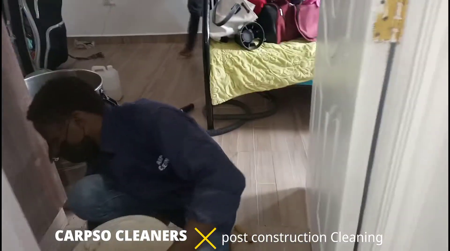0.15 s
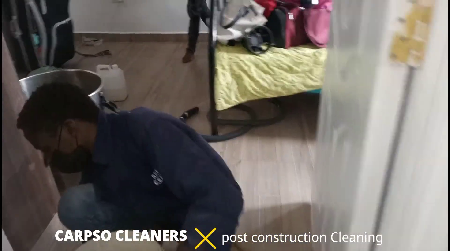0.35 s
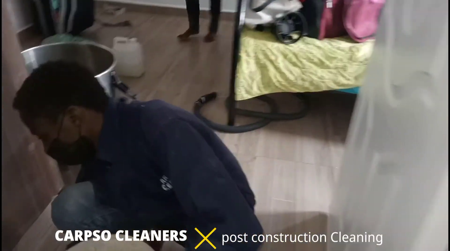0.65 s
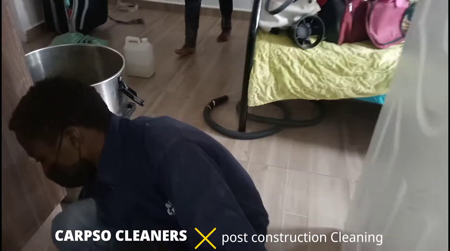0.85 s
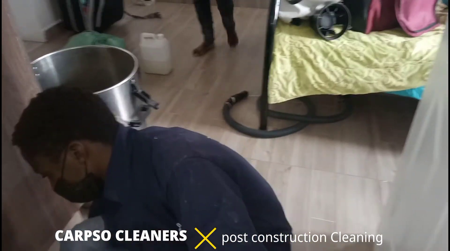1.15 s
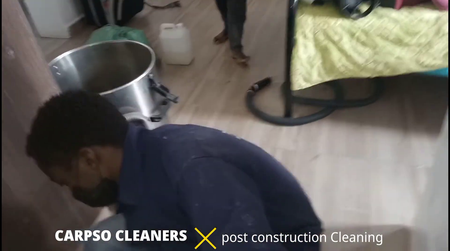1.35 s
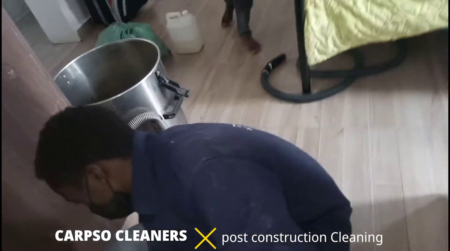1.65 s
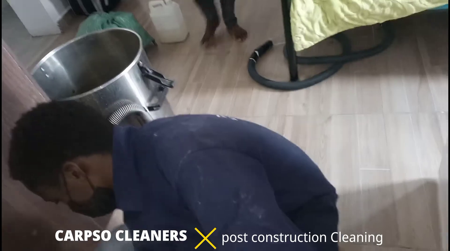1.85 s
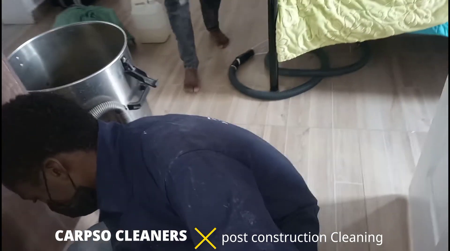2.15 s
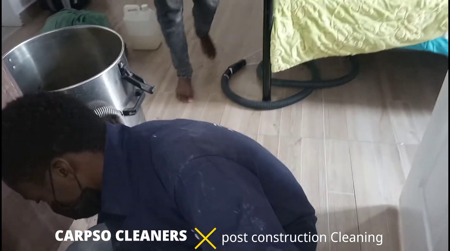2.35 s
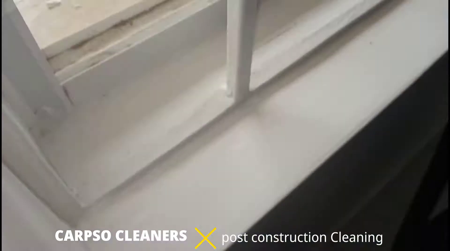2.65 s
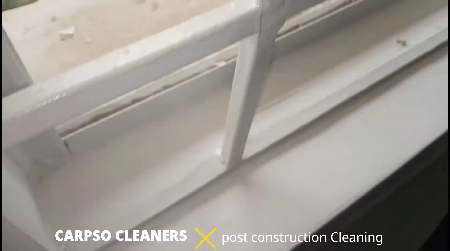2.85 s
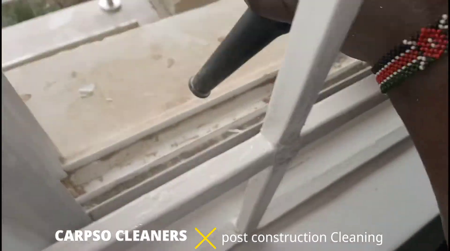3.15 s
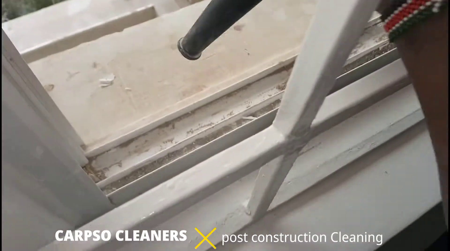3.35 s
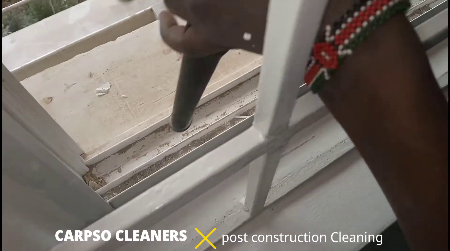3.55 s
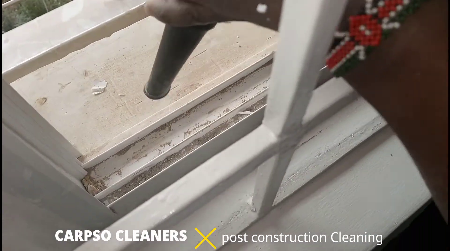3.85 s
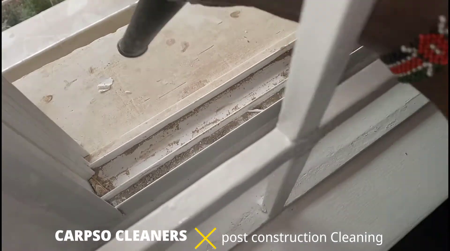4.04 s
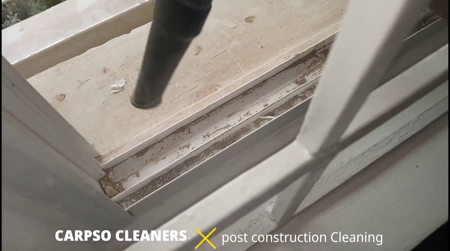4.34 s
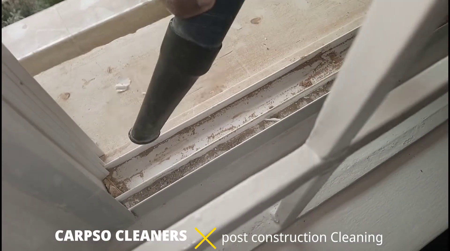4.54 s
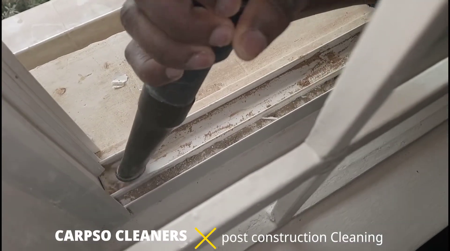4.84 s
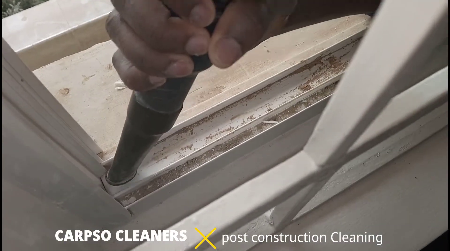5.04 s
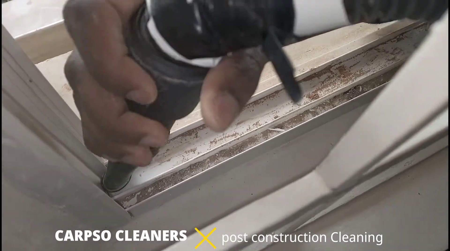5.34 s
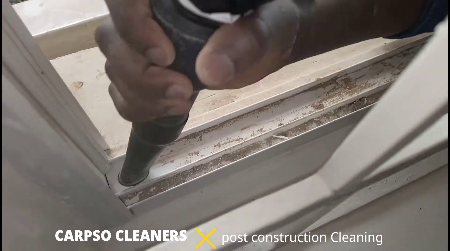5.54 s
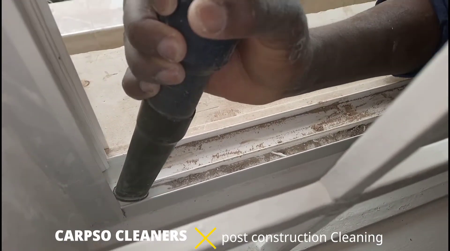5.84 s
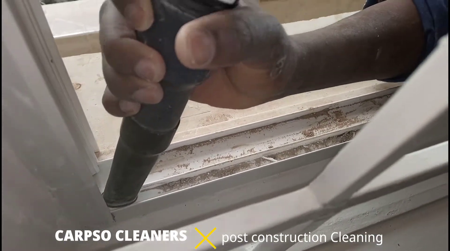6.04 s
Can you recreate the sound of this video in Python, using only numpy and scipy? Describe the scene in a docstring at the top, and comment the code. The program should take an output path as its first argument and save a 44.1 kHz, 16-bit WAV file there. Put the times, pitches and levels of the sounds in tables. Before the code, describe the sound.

Indoors, a very faint, muffled vacuum cleaner rush flutters and builds, with a few soft handling bumps, then stops short. The cleaner returns loud and close, with roaring air, a hissing nozzle and a throbbing motor hum and whine. The nozzle taps a window sill and presses into the corner, choking the roar into a raspy shriek while grit ticks up the tube. It then eases open again. The sound is mono.

```python
"""A faint, muffled vacuum rush with fluttering treble builds up and stops short; then the two-motor
cleaner is heard close up, in mono. Air roars in the hose and hisses at the crevice nozzle. The motors
run a few turns a second apart, so their hum throbs and their whine is doubled. Pressed into the corner
of a window sill, the nozzle chokes the roar, shrieks through the remaining gap and draws in grit."""
import sys
import numpy as np
from scipy import signal
from scipy.fft import rfft, irfft, next_fast_len
from scipy.io import wavfile
from scipy.ndimage import uniform_filter1d, map_coordinates

SR = 44100
rng = np.random.default_rng(int(sys.argv[2]) if len(sys.argv) > 2 else 0)


def to_wav(s):
    """Save 16-bit WAV."""
    ch = np.atleast_2d(s).T  # columns
    pcm = np.round(np.clip(ch, -1, 1) * 32767)  # PCM
    wavfile.write(sys.argv[1], SR, pcm.astype(np.int16))


N = 272979
TIME_S = np.arange(N) / SR


# Airflow spectra: freq_hz, relative_db
HOSE_ROAR = [(25, -35), (50, -24), (85, -19), (100, -4), (112, -10), (135, -2.5), (160, -10.5), (187, 3.5),
             (215, -5.5), (255, 2), (330, 1), (390, -3.5), (438, 1.5), (490, -6.5), (580, 0.5), (720, -26),
             (1100, -44)]
DUCT_RUSH = [(100, -50), (400, -5.5), (760, -3), (1000, -2.5), (1250, -1), (1500, -2), (1850, 0.5),
             (2200, 1.5), (2600, -4), (3200, -5.5), (5000, -40)]
LIP_HISS = [(300, -64), (1800, -18), (2700, -7), (3350, 0), (3700, -2.5), (4200, 0.5), (5100, 2), (5600, 0),
            (6500, 2.5), (7200, -3), (8000, -9.5), (9300, -7.5), (11000, -14), (13000, -19.5)]
LIP_FIZZ = [(1000, -60), (7000, -29), (10500, 4), (12000, -8), (13600, -7), (14600, 7), (15400, 8),
            (16000, -20)]
# Hiss envelope: time_s, level_db
HISS_ENVELOPE = [(2.8, -22.5), (3.1, -22.5), (3.4, -22.5), (3.85, -24), (4.3, -22), (5.3, -21.5),
                 (5.7, -22), (6.1, -20.5)]
# Gulps of air in the duct: peak_s, length_s, gain_db
DUCT_GULPS = [(5.456, 0.18, 3.5), (5.74, 0.12, 3.5)]

def airflow(seal):
    """Turbulent air in hose, duct and nozzle; sealing chokes the roar and makes the lip sputter."""
    gulp_db = sum(db * swell(peak_s, length_s) for peak_s, length_s, db in DUCT_GULPS)
    roar = amp(-32.5 - 14 * seal) * turbulence(spectrum(HOSE_ROAR), patchy_db=0.5)
    duct = amp(-29 - 1.1 * seal + gulp_db) * turbulence(spectrum(DUCT_RUSH), patchy_db=1.57)
    hiss = amp(curve(HISS_ENVELOPE)) * turbulence(spectrum(LIP_HISS), patchy_db=2.13)
    fizz = amp(-43 + 9.7 * np.sqrt(seal)) * noise(spectrum(LIP_FIZZ))
    sputter = amp(0.4 * wobble(12) + 0.9 * seal * wobble(250))
    return roar + duct + (hiss + fizz) * sputter


# Slower shaft: time_s, speed_hz
SHAFT_SPEED = [(2.7, 283.3), (3.1, 285), (3.35, 286.4), (3.57, 286.9), (3.75, 285), (3.9, 284.1),
               (4.3, 284.5), (5, 286), (5.7, 287.7), (6.19, 287)]
# Faster shaft's lead, the throb rate: time_s, lead_hz
SHAFT_LEAD = [(2.7, 1.7), (3.2, 4.1), (3.6, 5.32), (4.05, 5.98)]
# Shaft harmonics: multiple, slow_motor_db, fast_motor_db
HARMONICS = [(1, -31, -30), (2, -50, -52.5), (4, -44, -50), (6, -31.5, -36.5), (12, -63, -43)]
# Whine envelope: time_s, gain_db
WHINE_ENVELOPE = [(2.85, -3), (3.15, 0), (3.5, -4), (3.75, -1), (4.45, 1), (4.92, 0), (5.1, -3),
                  (5.45, 2.5), (6.0, 1.5)]

def motors(seal, choke_db=-11.5, opposed_s=5.068, lowest_whine_multiple=4):
    """Two rotors beat, the faster gaining one turn per throb. Less sound escapes a closed nozzle."""
    slow_turns = np.cumsum(curve(SHAFT_SPEED)) / SR
    lead_turns = np.cumsum(curve(SHAFT_LEAD)) / SR
    fast_turns = slow_turns + lead_turns - lead_turns[round(opposed_s * SR)] + 0.5
    multiples, slow_db, fast_db = np.transpose(HARMONICS)
    whine = amp(curve(WHINE_ENVELOPE))
    tones = 0
    for turns, levels_db in ((slow_turns, slow_db), (fast_turns, fast_db)):
        angle = 2 * np.pi * turns + 0.03 * wobble(40)
        for multiple, db in zip(multiples, levels_db):
            gain = amp(db) * (whine if multiple >= lowest_whine_multiple else 1)
            tones += np.sqrt(2) * gain * np.sin(round(multiple) * angle)
    return amp(choke_db * seal ** 1.26 + 0.32 * wobble(25)) * tones


# Resonances of the nearly closed nozzle: centre_hz, width_hz, gain_db
RASP_MODES = [(3220, 120, -1.5), (3690, 360, -2.5), (4050, 210, 2.5), (4370, 170, -1.5)]
SHRIEK_MODES = [(5890, 420, -1), (6400, 360, 3.5), (7090, 450, 2), (8560, 1040, -7.5), (9900, 1000, -11.5)]
# Jet balance, positive towards the rasp: time_s, tilt_db
JET_BALANCE = [(4.95, -0.5), (5.14, -4), (5.23, 3), (5.4, -1.5), (5.58, 0), (5.8, -6), (6.1, -3.5)]

def gap_jet(seal, flutter_db=1.46):
    """The jet through the last gap grows with the seal, sputters and rings the nozzle's resonances."""
    tilt_db = curve(JET_BALANCE)
    rasp = amp(-18 + tilt_db) * seal ** 1.36 * turbulence(resonances(RASP_MODES), patchy_db=3.0)
    shriek = amp(-18 - tilt_db) * seal ** 1.17 * turbulence(resonances(SHRIEK_MODES), patchy_db=2.5)
    low_cut = spectrum([(1200, -20), (3000, -0.5)])
    return amp(flutter_db * wobble(220)) * filtered(rasp + shriek, low_cut)


# Nozzle passes: peak_s, length_s, level_db, pitch_hz, glide_hz_per_s, width_hz
NOZZLE_PASSES = [(3.42, 0.4, -34, 6490, 48.5, 807), (4.151, 0.52, -29.5, 4240, 602, 798),
                 (4.701, 0.43, -26.5, 5460, 2300, 955), (5.25, 0.065, -18, 4070, -1500, 600),
                 (5.365, 0.14, -23.5, 3230, 0.5, 199.4), (5.85, 0.37, -29, 4100, -600, 908),
                 (6.182, .08, -24, 3750, -200, 502)]

def nozzle_rings():
    """The air between nozzle and sill rings, gliding as the nozzle moves."""
    rings = 0
    for peak_s, length_s, db, pitch_hz, glide_hz_per_s, width_hz in NOZZLE_PASSES:
        gliding_hz = pitch_hz + glide_hz_per_s * (TIME_S - peak_s)
        rings += amp(db) * swell(peak_s, length_s) * fuzzy_tone(gliding_hz, width_hz)
    return rings


def grit(seal, sealed_grains_per_s=110, gain_db=-18.5):
    """Grains tick up the tube, more of them as the nozzle nears the sill."""
    hits = rng.random(N) < sealed_grains_per_s * seal / SR
    sizes = amp(3.9 * np.minimum(rng.exponential(size=N), 3))
    signs = rng.choice([-1, 1], N)
    tube = resonances([(4200, 1800, -16), (6900, 1600, 15.5), (12000, 5000, 0)])
    return amp(gain_db) * filtered(hits * sizes * signs, tube)


def sill_tap(time_s=4.9663, centre_hz=270, gain_db=-10.5):
    """The nozzle meets the sill: one low push with no ring."""
    phase = 2 * np.pi * centre_hz * (TIME_S - time_s)
    push = phase * np.exp(-phase ** 2 / 2)
    return amp(gain_db) * filtered(push, spectrum([(40, -12), (200, 1.5)]))


# Handling bumps: start_s, level_db, pitch_hz, t60_s
HANDLING_BUMPS = [(1.2, -60.5, 190, 0.43), (2.336, -57, 240, 0.67), (2.38, -53, 230, .4),
                  (2.56, -56, 306, .25)]
# Sharp ticks: start_s, level_db
TICKS = [(3.007, -7), (5.018, -15), (5.032, -20)]

def knocks(bump_attack_s=0.0018, tick_t60_s=0.0076):
    """Dull bumps of handling and a few sharp ticks, each a decaying burst of noise."""
    bursts = np.zeros(N)
    for start_s, db, pitch_hz, t60_s in HANDLING_BUMPS:
        age_s = np.maximum(TIME_S - start_s, 0)
        mode = resonances([(pitch_hz, pitch_hz / 2, 0)])
        thud = noise(lambda hz: mode(hz) ** 2)
        attack = 1 - np.exp(-age_s / bump_attack_s)
        bursts += attack * amp(db - 60 * age_s / t60_s) * thud
    for start_s, db in TICKS:
        snap = noise(spectrum([(500, -5), (4000, -8), (7000, 3), (10000, -10), (15000, -6)]))
        decay = (TIME_S >= start_s) * amp(db - 60 * np.abs(TIME_S - start_s) / tick_t60_s)
        bursts += filtered(decay * snap, spectrum([(100, -16), (2000, 0)]))
    return bursts


# Muffled rush spectrum: freq_hz, relative_db
RUSH_SPECTRUM = [(240, -41), (400, -9.5), (552, -18.5), (614, -7.5), (749, -16.5), (900, -7), (1360, -7.5),
                 (1630, -4.5), (2430, -3.5), (3410, -5), (6480, -2.5), (8150, -10), (9950, -7),
                 (13300, -15.5), (15500, -2)]
# Build-up: time_s, strength (0-1)
RUSH_BUILD = [(0, 0), (1.44, 0), (1.56, 0.14), (1.9, 0.46), (2.35, 1), (2.68, 0.89)]
# Bands, low to high: rest_db, full_db, strength_exponent, swell_offset_db, flutter_db
RUSH_BANDS = [(-77, -52.5, 2, -28, 1.5), (-63.5, -46.5, 1.4, -11, 1.2), (-63, -46.5, 0.53, 0.5, 1.1),
              (-74, -49.5, 0.53, -3, 1.3)]
# Dull and bright swells: peak_s, length_s, level_db, tilt_db_per_band
RUSH_SWELLS = [(.03, 0.09, -60, -1), (.165, 0.087, -56, 4), (.23, 0.11, -60, 4), (.39, .16, -64.5, -13),
               (.59, 0.15, -57, -2), (0.754, 0.11, -59, 3), (.9, 0.12, -57, 4), (1.03, 0.084, -57.5, 3),
               (1.154, 0.11, -56.5, 6.5), (1.287, 0.2, -52, 0.5), (1.59, 0.12, -50, -0.5),
               (1.655, 0.081, -51, 7.5), (1.751, 0.032, -46, -1.5), (1.794, .07, -50.5, -.5),
               (1.92, 0.067, -50.5, 3), (2.017, 0.067, -50, 2), (2.58, 0.037, -55, 11),
               (2.662, 0.057, -49.5, 9)]

def muffled_rush(edges_hz=(450, 1150, 3200, 7800, 16000)):
    """A faint, muffled vacuum rush with fluttering treble builds, swelling in dull and bright patches."""
    strength = np.maximum(curve(RUSH_BUILD), 0)
    air = 0
    for band, (rest_db, full_db, exponent, offset_db, flutter_db) in enumerate(RUSH_BANDS):
        low_hz, high_hz = edges_hz[band:band + 2]

        def response(hz):
            rolloff = (1 + (low_hz / (hz + 1)) ** 12) * (1 + (hz / high_hz) ** 12)
            return spectrum(RUSH_SPECTRUM)(hz) / np.sqrt(rolloff)

        steady = amp(rest_db + (full_db - rest_db) * strength ** exponent)
        patches = swells([(peak_s, length_s, db + offset_db + tilt_db * (band - 2))
                          for peak_s, length_s, db, tilt_db in RUSH_SWELLS])
        flutter = amp(flutter_db * wobble(25))
        air += np.hypot(steady, patches) * flutter * turbulence(response, patchy_db=2.36)
    return air


# Low room spectra: freq_hz, relative_db
RUMBLE_SPECTRUM = [(20, -26), (55, 1), (85, 1), (140, -34), (400, -60)]
BOOM_SPECTRUM = [(60, -30), (105, -3), (145, 5), (200, -10.5), (260, -8), (400, -11), (700, -50)]
# Soft booms and stretches of hum: peak_s, length_s, level_db
BOOM_SWELLS = [(.36, 0.33, -68), (1.26, 0.24, -67), (1.66, 0.085, -66), (1.92, 0.18, -65)]
HUM_SWELLS = [(.75, 0.09, -71), (1.13, .16, -64.5), (1.61, 0.26, -66), (1.8, 0.12, -67), (1.96, 0.17, -68)]
# Rising hum: time_s, pitch_hz
HUM_PITCH = [(1.05, 312), (1.5, 344), (1.9, 384), (2.1, 376)]
# Faint squeaks: peak_s, length_s, pitch_hz, level_db
FAINT_SQUEAKS = [(.13, .4, 2000, -63.5), (0.886, 0.19, 1300, -67), (1.504, .14, 1230, -65),
                 (1.865, 0.13, 584, -68)]

def room(rumble_db=-77, boom_rest_db=-74.5):
    """The room rumbles and booms; a weak rising hum and thin squeaks come and go."""
    rumble = amp(rumble_db) * noise(spectrum(RUMBLE_SPECTRUM))
    boom = np.hypot(amp(boom_rest_db), swells(BOOM_SWELLS)) * noise(spectrum(BOOM_SPECTRUM))
    hum = swells(HUM_SWELLS) * fuzzy_tone(curve(HUM_PITCH), width_hz=71)
    squeaks = sum(amp(db) * swell(peak_s, length_s) * fuzzy_tone(pitch_hz, width_hz=110)
                  for peak_s, length_s, pitch_hz, db in FAINT_SQUEAKS)
    return amp(1.5 * wobble(8.9)) * (rumble + boom) + hum + squeaks


def amp(db):
    """Decibels to gain."""
    return 10 ** (np.asarray(db) / 20)


def unit(x):
    """Scaled to rms 1."""
    return x / np.sqrt(np.mean(x ** 2) + 1e-20)


def curve(points):
    """One value per sample through (time_s, value) points."""
    return np.interp(TIME_S, *np.transpose(points))


def swell(peak_s, length_s):
    """A bell-shaped rise and fall of height 1."""
    return np.exp(-(2 * (TIME_S - peak_s) / length_s) ** 2)


def swells(rows):
    """Gain of (peak_s, length_s, level_db) swells, summed in power."""
    return np.sqrt(sum((amp(db) * swell(peak_s, length_s)) ** 2 for peak_s, length_s, db in rows))


def wobble(knots_per_s):
    """A smooth random curve."""
    knots = rng.standard_normal(int(N * knots_per_s / SR) + 4)
    return map_coordinates(knots, [TIME_S * knots_per_s])


def filtered(x, response):
    """Apply a frequency response by padded FFT."""
    size = next_fast_len(N + SR // 2)
    return irfft(rfft(x, size) * response(np.fft.rfftfreq(size, 1 / SR)), size)[:N]


def spectrum(points):
    """Response through (freq_hz, gain_db) points on a log axis."""
    freq_hz, db = np.transpose(sorted(points))
    return lambda hz: amp(np.interp(np.log(hz + 1), np.log(freq_hz), db))


def resonances(modes):
    """Response of (centre_hz, width_hz, gain_db) modes, alternating in sign."""
    return lambda hz: sum(
        (-1) ** k * amp(db) * 1j * hz * width_hz / (centre_hz ** 2 - hz ** 2 + 1j * hz * width_hz)
        for k, (centre_hz, width_hz, db) in enumerate(modes))


def noise(response):
    """Coloured noise of rms 1."""
    return unit(filtered(rng.standard_normal(N), response))


def turbulence(response, patchy_db):
    """Coloured noise of rms 1 whose bands swell and sink in patches."""
    frames = signal.stft(noise(response), nperseg=1024)[2]
    patches = uniform_filter1d(rng.standard_normal(frames.shape), size=6, axis=0)
    patches = uniform_filter1d(patches, size=16, axis=1)
    frames *= amp(patchy_db * unit(patches))
    return unit(signal.istft(frames, nperseg=1024)[1][:N])


def fuzzy_tone(pitch_hz, width_hz):
    """Narrow-band noise of rms 1 around a steady or moving pitch."""
    drift = wobble(width_hz) + 1j * wobble(width_hz)
    cycles = np.cumsum(pitch_hz * np.ones(N)) / SR
    return unit(np.real(drift * np.exp(2j * np.pi * cycles)))


def fade_in(start_s=2.709, length_s=0.25, start_gain=0.11, dip_db=-12.5):
    """Gain of the close sound: a straight rise, then one brief dip."""
    rise = (TIME_S - start_s) / length_s
    dip = amp(dip_db * swell(peak_s=3.014, length_s=0.038))
    return (rise > 0) * np.clip(rise, start_gain, 1) * dip


# Nozzle closure against the sill: time_s, seal (0 open, 1 sealed)
NOZZLE_SEAL = [(3.9, 0), (4.78, 0), (4.99, 0.16), (5.06, 0.41), (5.25, 0.92), (5.4, 0.98), (5.57, 1),
               (5.67, 0.16), (5.82, 0.19), (5.93, 0.24), (6.17, 0.43)]

def scene(faint_end_s=2.685):
    """The muffled rush, a moment of near silence, then the nozzle close up; both channels alike."""
    seal = np.clip(curve(NOZZLE_SEAL), 0, 1)
    close = motors(seal) + airflow(seal) + nozzle_rings() + gap_jet(seal) + grit(seal)
    faint = (muffled_rush() + room()) * (TIME_S < faint_end_s)
    noise_floor = amp(-74) * noise(spectrum([(30, -4), (500, 0), (15000, -9)]))
    mono = faint + fade_in() * close + knocks() + sill_tap() + noise_floor
    return np.array([mono, mono])


def record(dry):
    """Brick-wall low-pass."""
    cutoff_hz = 15600
    return np.array([filtered(channel, lambda hz: hz < cutoff_hz) for channel in dry])


dry = scene()
out = record(dry)
to_wav(out)
```